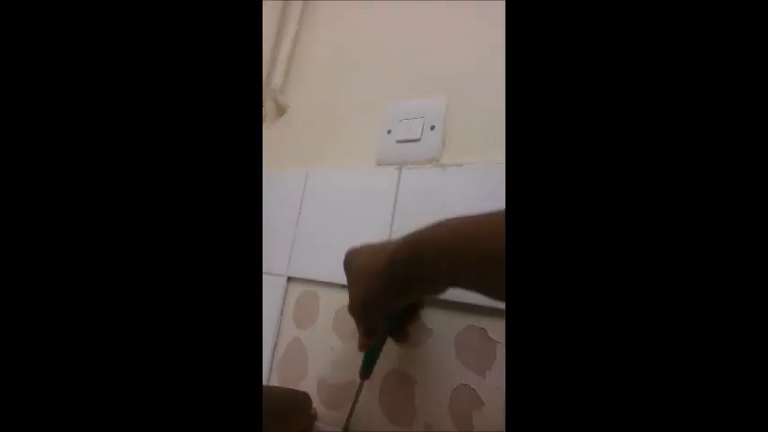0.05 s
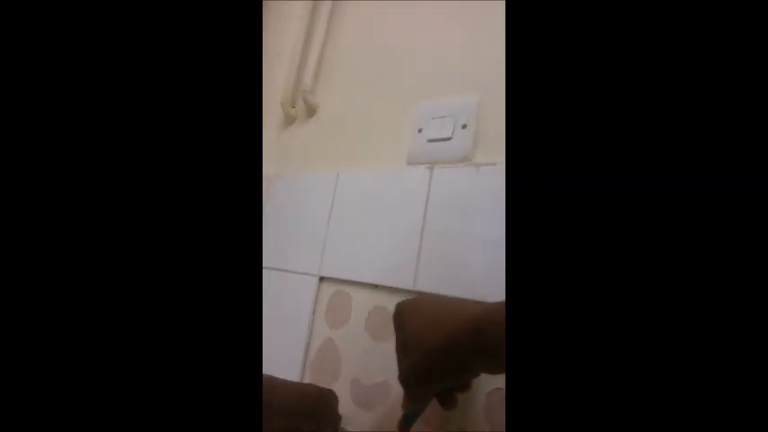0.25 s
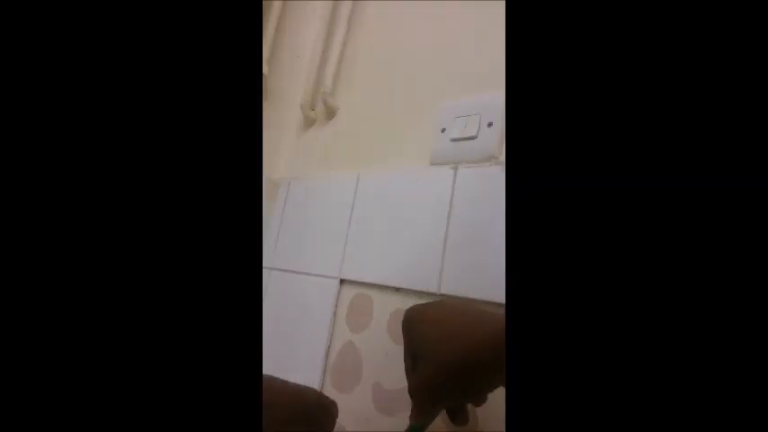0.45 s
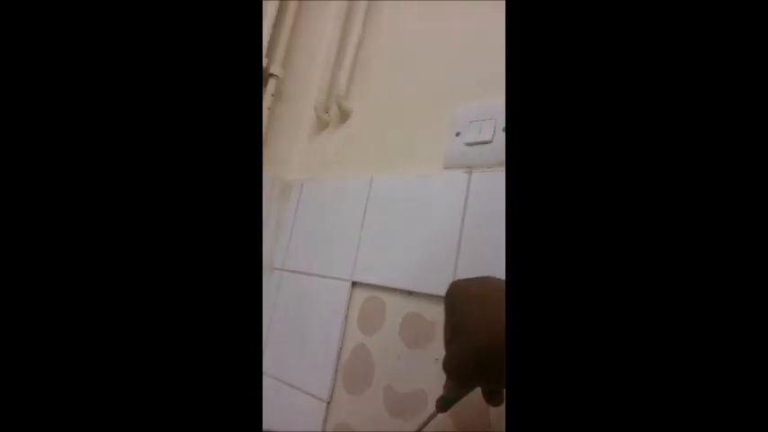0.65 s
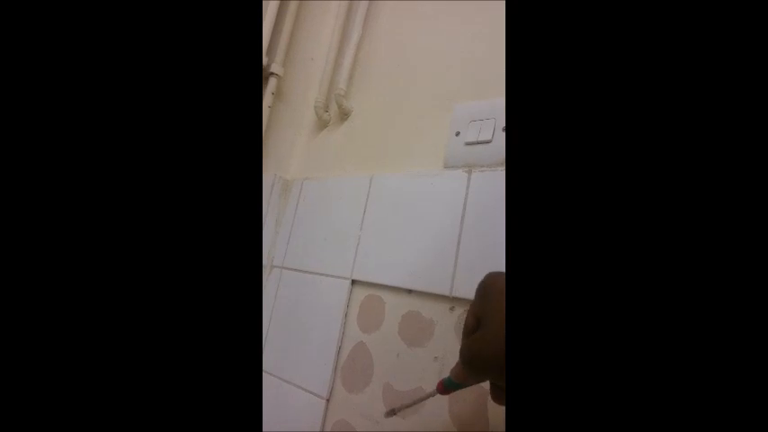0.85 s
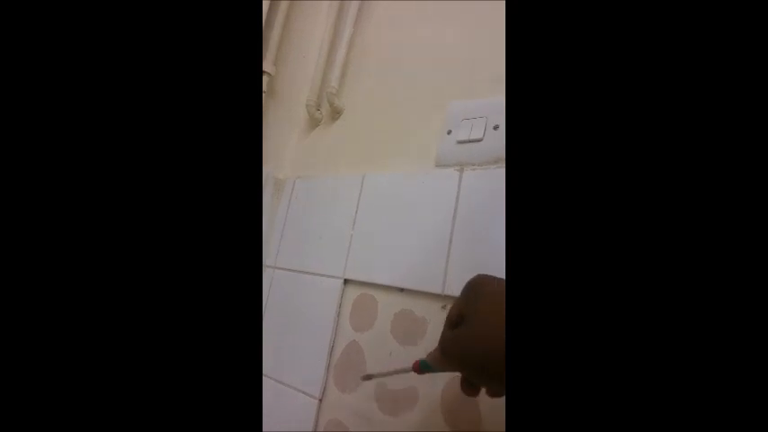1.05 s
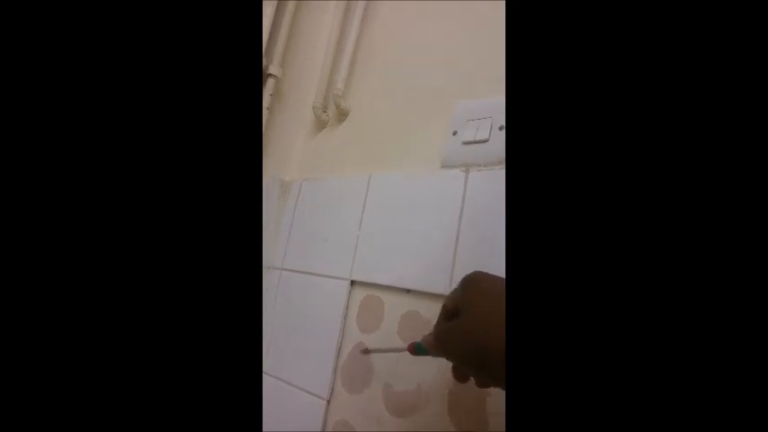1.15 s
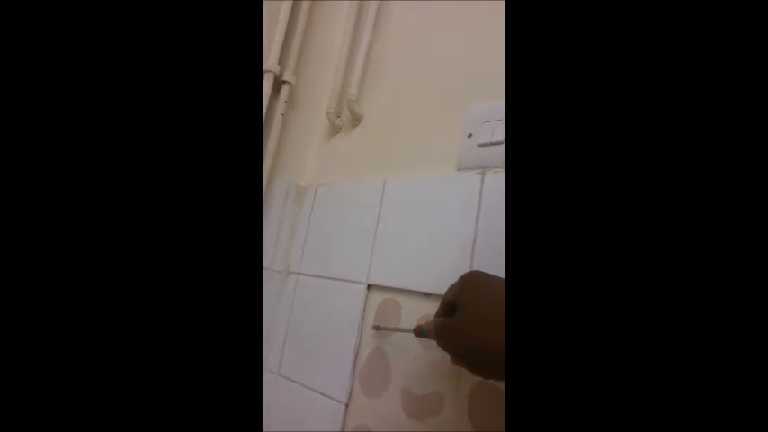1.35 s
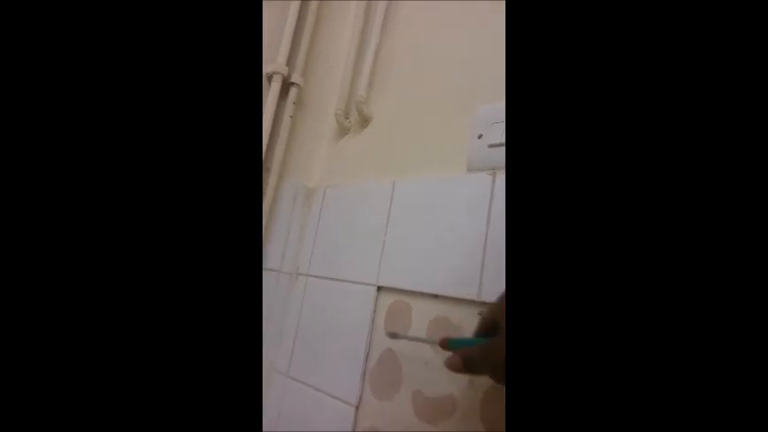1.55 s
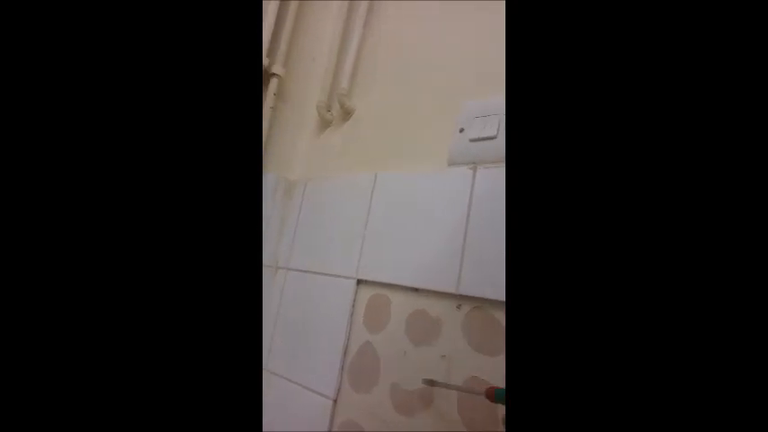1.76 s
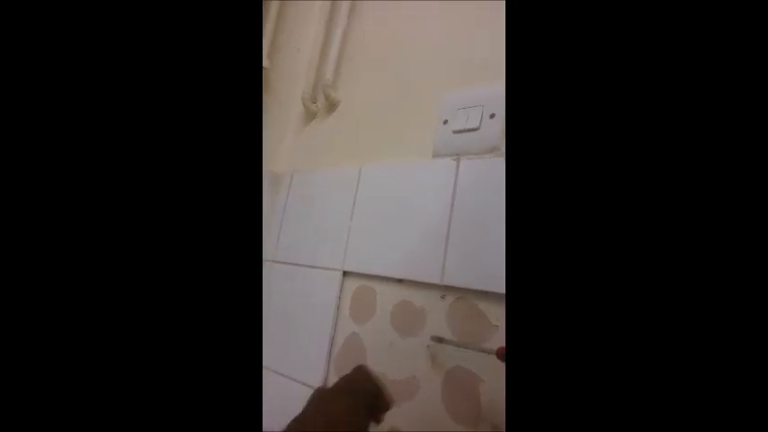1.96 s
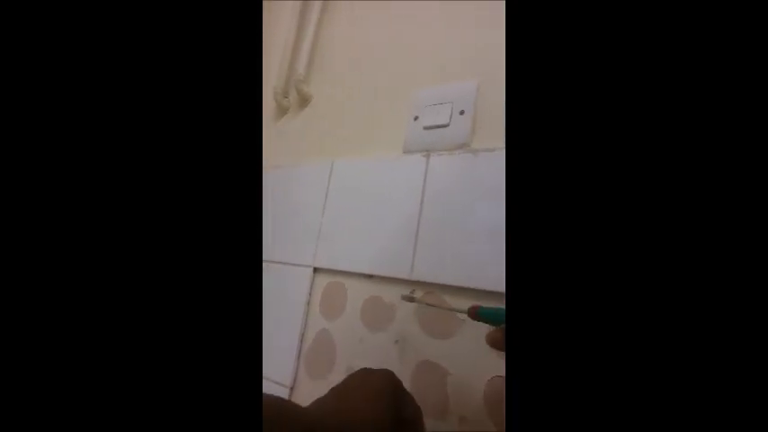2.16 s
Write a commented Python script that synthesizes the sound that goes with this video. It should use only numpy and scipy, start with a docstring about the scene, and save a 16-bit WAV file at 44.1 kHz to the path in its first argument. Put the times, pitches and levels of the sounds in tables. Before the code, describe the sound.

A screwdriver scrapes and knocks at tile grout in a small echoing room.

```python
"""A screwdriver scrapes and prises at the grout round a hollow wall tile in a small tiled room.
Its tip sticks and slips in short strokes and knocks against the edges; each contact rings the steel
blade, crunches grout, sprays fine grit and sounds the tile and the wall behind it. Brief notes sing out,
the hand bumps the wall, the tip glides once over the glaze and the shaft clinks twice near the end.
The room adds a short bright echo, and a phone close by picks it all up over a faint background noise."""
import sys
import numpy as np
from scipy import signal
from scipy.fft import rfft, irfft
from scipy.io import wavfile
from scipy.ndimage import uniform_filter1d

SR = 44100
rng = np.random.default_rng(int(sys.argv[2]) if len(sys.argv) > 2 else 0)


def digitize_waveform(pressure):
    """Quantize a signal to 16-bit integers and store it at the path in sys.argv[1].

    Rows of a 2-D input are taken as channels; values are limited to [-1, 1].
    """
    field = np.atleast_2d(pressure).T
    bounded = np.clip(field, -1, 1)
    quanta = np.round(bounded * 32767).astype(np.int16)
    wavfile.write(sys.argv[1], SR, quanta)


N = 97020


def undb(db):
    """Turn decibels into a number to multiply by."""
    return 10 ** (np.asarray(db) / 20)


def unit(response):
    """Scale a response (the sound that one tap gives) to an energy of one."""
    return response / np.sqrt(np.sum(response ** 2, axis=-1, keepdims=True))


def through(sound, response):
    """Pass a sound through a response."""
    return signal.fftconvolve(sound, response)[:N]


def steady(sound):
    """Even out the loudness over stretches of 25 ms."""
    return sound / np.sqrt(uniform_filter1d(sound ** 2, SR // 40))


def colour(points, size=2048):
    """A response that shapes the tone along (frequency [Hz], level [dB]) points."""
    hz, db = np.array(points).T
    f = np.maximum(np.arange(size // 2 + 1) * SR / size, 1)
    log_gain = np.log(undb(np.interp(np.log(f), np.log(hz), db)))
    cepstrum = irfft(log_gain)
    cepstrum[1:size // 2] *= 2  # folded so that nothing sounds before the tap
    cepstrum[size // 2 + 1:] = 0
    return irfft(np.exp(rfft(cepstrum)))


def fade(t, fade_s):
    """Die away by 60 dB in fade_s seconds; every fade time below means this."""
    return np.exp(-np.log(1000) * t / fade_s)


def ring(notes):
    """A tapped object rings with fading notes, each sounding only near its own pitch."""
    t, out = np.arange(SR // 2) / SR, 0
    for hz, db, fade_s in notes:
        note = np.sin(2 * np.pi * hz * t) * fade(t, fade_s)
        near_pitch = signal.iirpeak(hz, 2, fs=SR)
        out = out + undb(db) * unit(signal.lfilter(*near_pitch, note))
    return unit(out)


def surrounding_noise(size, bass_likeness=0.75, bass_hz=750):
    """Noise from all round at two microphones: alike in the bass, unrelated in the treble."""
    shared, own = rng.standard_normal(size), rng.standard_normal((2, size))
    f = np.arange(size // 2 + 1) * SR / size
    likeness = bass_likeness / (1 + (f / bass_hz) ** 2)
    return irfft(np.sqrt(likeness) * rfft(shared) + np.sqrt(1 - likeness) * rfft(own), size)


# Tone of the quiet room: (frequency [Hz], relative level [dB])
BACKGROUND_TONE = [(25, -23), (65, 9.5), (110, 7.5), (400, 1.5), (900, -9), (3000, -14), (5600, -7),
                   (8000, -18), (15000, -19.5)]
def background(level_db=-51):
    """A faint, steady rumble and hiss fills the room."""
    tone = unit(colour(BACKGROUND_TONE))
    return undb(level_db) * np.array([through(side, tone) for side in surrounding_noise(N)])


def stick_slip(slip_hz=300.2, slip_s=0.00079, rub_db=-10, judder_hz=124.3, judder_db=2, count=3000):
    """The tip catches and lets go in tiny uneven bursts over a steady rub, while the hand judders."""
    t = np.arange(N) / SR
    gaps, sizes, shakes = rng.standard_normal((count, 3)).T
    times = np.cumsum(np.exp(0.45 * gaps) / slip_hz)
    strengths = undb(4.5 * np.clip(sizes, -2, 2))
    slips = np.bincount((times * SR).astype(int), strengths, N)[:N]
    bursts = through(slips, np.exp(-t[:SR // 20] / slip_s))
    judder = undb(judder_db * np.interp(t * judder_hz, np.arange(count), shakes))
    grip = (bursts / bursts.std() + undb(rub_db)) * judder
    return steady(grip * rng.standard_normal(N))


# Strokes of the tip; the last three columns are added to the level:
# (start [s], length [s], level [dB], swell over the stroke [dB], crunch [dB], grit [dB], tile [dB])
STROKES = [(0.083, 0.037, -38.5, 0, -9.5, -10.5, -37), (0.122, 0.021, -34, 4, -7, -10.5, -30),
           (0.214, 0.12, -21.5, -0.5, -6.5, -13.5, -20.5), (0.317, 0.032, -18.5, 9, -12, -18.5, -17.5),
           (0.353, 0.017, -19, 10, -5, -6, -10.5), (0.368, 0.013, -6.5, -4, -13, -10, -29),
           (0.375, 0.046, -23.5, -7, -16, -31, -11), (0.408, 0.072, -29, 4, -7, -19, -18),
           (0.511, 0.049, -20.5, -3.5, -5, -4.5, -10.5), (0.561, 0.045, -20, 5.5, -9.5, -9.5, -10.5),
           (0.633, 0.038, -30, 9, -7.5, -12.5, -4), (0.719, 0.013, -20, -2.5, -0.5, -8.5, -13),
           (0.739, 0.014, -11, 2, -8.5, -12, -12.5), (0.779, 0.054, -27.5, 4, -11.5, -12.5, -26),
           (0.837, 0.035, -16.5, 7.5, -7, -12.5, -9.5), (0.88, 0.01, -24, 5, -3, -6, -24),
           (0.896, 0.0355, -14, 5, -7.5, -12.5, -15), (0.967, 0.087, -35, -5, -12, -13.5, -27),
           (1.066, 0.024, -16.5, -15.5, -9, -14.5, -24), (1.098, 0.11, -42.5, 14.5, -6, -7.5, -18),
           (1.205, 0.09, -33, 6.5, -8.5, -14, -14), (1.305, 0.071, -30, 6, -8.5, -8, -13.5),
           (1.394, 0.038, -36, 8, -14, -13, -18), (1.458, 0.112, -28.5, 6, -11, -11.5, -13),
           (1.58, 0.031, -30, 5, -0.5, -46, 4), (1.634, 0.051, -35.5, -13, -26, -11.5, 2.5),
           (1.704, 0.089, -38, -2.5, -3, -11, -2), (1.803, 0.044, -29.5, 8.5, -13, -17, -12)]
def scrapes(attack_s=0.005, release_s=0.0038, wall_db=-25.5):
    """Each stroke grows or eases, then stops; its rubbing sounds blade, grout, tile and wall."""
    t, pressure = np.arange(N) / SR, 0
    for start, length, db, swell, crunch_db, grit_db, tile_db in STROKES:
        age = t - start
        shape = np.clip(age / attack_s, 0, 1) * np.exp(-np.maximum(age - length, 0) / release_s)
        level = undb(db + swell * (np.clip(age / length, 0, 1) - .5))
        pressure = pressure + np.outer(undb([0, crunch_db, grit_db, tile_db, wall_db]), shape * level)
    friction = stick_slip()
    grains = steady(friction * np.abs(friction))  # grit breaks off only at the hardest slips
    forces = pressure * np.array([friction, friction, grains, friction, friction])
    return contact(*forces, knocked=False)


# Notes of the steel blade: (pitch [Hz], relative level [dB], fade time [s])
BLADE_NOTES = [(2880, 17.5, 0.017), (3346, 7, 0.0194), (4220, 5.5, 0.027), (5144, 1.5, 0.033),
               (5780, -1.5, 0.29), (9770, 4, 0.06)]
# Tone of the blade's hiss: (frequency [Hz], relative level [dB])
BLADE_TONE = [(1000, -40), (3600, -20.5), (4400, -2.5), (5300, 5.5), (6200, 1.5), (7100, -9), (9000, -18),
              (15000, -48)]
def blade(force, ring_db=-23.5):
    """The steel blade gives a bright hiss and a faint ring."""
    ringing, hiss = undb(ring_db) * ring(BLADE_NOTES), unit(colour(BLADE_TONE))
    hiss = np.pad(hiss, (0, len(ringing) - len(hiss)))
    return through(force, unit(ringing + hiss))


# Tones of crunching grout and of fine grit: (frequency [Hz], relative level [dB])
CRUNCH_TONE = [(100, -39), (300, -17.5), (520, -11.5), (800, -5.5), (1300, -2), (2100, -4.5), (3100, 5),
               (4200, 4), (7000, -24.5), (15000, -40)]
GRIT_TONE = [(2000, -17.5), (6000, 0), (8300, 14.5), (10500, 5.5), (15500, 2)]
def grout(crushing, spraying):
    """Grout crunches under the tip and sprays fine, hissing grit."""
    return through(crushing, unit(colour(CRUNCH_TONE))) + through(spraying, unit(colour(GRIT_TONE)))


# Notes of the tile: (pitch [Hz], share when knocked [dB], share when scraped [dB], fade time [s])
TILE_NOTES = [(956, -19, -12, 0.15), (981, 21, 0, 0.052), (1075.5, -24, -7, 0.17)]
def tile(force, knocked):
    """The hollow tile rings; a knock and a scrape bring out different notes."""
    notes = [(hz, knock_db if knocked else scrape_db, fade_s)
             for hz, knock_db, scrape_db, fade_s in TILE_NOTES]
    return through(force, ring(notes))


# Notes of the wall: (pitch [Hz], relative level [dB], fade time [s])
WALL_NOTES = [(237.3, -9, 0.056), (335.2, -8, 0.16), (433, -14, 0.41), (541, -8, 0.17), (621.6, -6, 0.043),
              (886, -6.5, 0.15), (1398, -6, 0.046)]
def wall(force):
    """The wall behind the tile rings with mostly lower notes."""
    return through(force, ring(WALL_NOTES))


def contact(on_blade, on_grout, on_grit, on_tile, on_wall, knocked):
    """One touch of the tip sounds all these parts together."""
    return blade(on_blade) + grout(on_grout, on_grit) + tile(on_tile, knocked) + wall(on_wall)


# Knocks of the tip; the last four columns are added to the level:
# (time [s], level [dB], crunch [dB], grit [dB], tile [dB], wall [dB])
KNOCKS = [(0.164, -27.5, -10, -11.5, -23, -14.5), (.195, -23.5, 2, -9.5, -13, -17),
          (0.206, -25, -10, -11, -28, -8), (0.375, -11, 3, -6, -4, -13), (.383, -15, 2, -9, -14, -14.5),
          (.466, -32.5, -6, -18, 4, -19), (0.495, -11.5, -5.5, -7, -37, -37),
          (.505, -19.5, 1.5, -0.5, -23, -13), (0.564, -14, -2.5, -12, -15, -20.5),
          (.613, -14, -4, -13, -36, -20), (0.7076, -16.5, -3.5, -8.5, -15, -39),
          (.744, -10.5, -7.5, -7.5, -10.5, -49), (0.9581, -13, -32, -40, -25, -35),
          (1.0605, -11, -11.5, -12, -36, -28), (1.229, -21, -4.5, -12.5, -15, -23.5),
          (1.3882, -23.5, -7.5, -20, 10.5, -9.5), (1.421, -35.5, -0.5, -22, 9.5, -11),
          (1.59, -20.5, -8.5, -13, 1, -6), (1.607, -16.5, -1, -31, -19, -6.5),
          (1.63, -26, -29, -45, 8, 4.5), (1.7276, -27, -3, -16, 4.5, 0.5), (1.768, -32, -4.5, -13, 3, 3.5),
          (1.849, -26, 9.5, -27, 9, 3.5), (1.872, -17, -1.5, -20, 3.5, -0.5),
          (1.9116, -22.5, -0.5, -37, -15, 1.5)]
def knocks(rattle_s=0.0011, size=2048):
    """Each knock is one push into tile and wall, and a brief rattle of the tip on the grout."""
    forces, t = np.zeros((5, N + size)), np.arange(size) / SR
    push = signal.unit_impulse(size)
    for at, db, *shares_db in KNOCKS:
        rattle = unit(rng.standard_normal(size) * np.exp(-t / rattle_s))
        strengths = np.sqrt(SR / 250) * undb(db) * undb([0, *shares_db])
        i = int(at * SR)
        forces[:, i:i + size] += strengths[:, None] * np.array([rattle, rattle, rattle, push, push])
    return contact(*forces[:, :N], knocked=True)


# Notes that the tip locks on to: those near 1.6 kHz from the screwdriver's shaft, the lower ones from tile or
# wall; the pitch depends on the spot: (peak time [s], pitch [Hz], level [dB], rise time [s], fade time [s])
SINGING_NOTES = [(.57, 1630, -22, 0.0057, 0.057), (0.61, 1650, -34.5, 0.0083, 0.15),
                 (0.71, 1571, -18.5, 0.0045, 0.051), (0.82, 1560, -26, 0.012, .11),
                 (0.93, 1560, -25.5, 0.015, 0.16), (.768, 910, -29.5, .014, .06),
                 (0.89, 985, -22.5, 0.015, 0.082), (0.94, 1006, -23, 0.019, 0.25),
                 (1.17, 985, -36, 0.013, 0.11), (.25, 530, -39.5, 0.033, 0.43)]
def singing(waver_hz=130.7, waver_rad=0.64, waver_db=3.5):
    """Notes build up under the rubbing tip, waver with its grip and ring out."""
    t, out = np.arange(N) / SR, 0
    for peak, hz, db, rise_s, fade_s in SINGING_NOTES:
        age = t - peak
        drift, flutter = (np.interp(t * waver_hz, np.arange(1024), steps)
                          for steps in rng.standard_normal((2, 1024)))
        shape = np.exp(np.minimum(age, 0) / rise_s) * fade(np.maximum(age, 0), fade_s)
        note = np.sqrt(2) * np.sin(2 * np.pi * hz * age + waver_rad * drift)
        out = out + undb(db + waver_db * flutter) * shape * note
    return out


# Bumps of the hand: (time [s], level [dB])
BUMPS = [(0.375, -38), (0.741, -46.5), (0.962, -29), (1.065, -31), (1.868, -34.5)]
# Low notes of a bump: (pitch [Hz], relative level [dB], fade time [s])
BUMP_NOTES = [(62, -10.5, 0.1), (139, -16.5, 0.069)]
def bumps():
    """The hand hits the wall with dull thuds."""
    force = np.zeros(N)
    for at, db in BUMPS:
        force[int(at * SR)] = np.sqrt(SR / 100) * undb(db)
    return through(force, ring(BUMP_NOTES))


# Tone of steel gliding on the glaze: (frequency [Hz], relative level [dB])
GLIDE_TONE = [(600, -30), (1250, 2), (2000, -2), (3000, -12.5), (8000, -14.5)]
def glide(start_s=1.1875, length_s=0.14, level_db=-33.5):
    """The flat of the tip glides over the glaze: a soft, hollow rub that swells and fades."""
    progress = np.clip((np.arange(N) / SR - start_s) / length_s, 0, 1)
    swell = np.sqrt(4 * progress * (1 - progress))
    return through(undb(level_db) * swell * stick_slip(), unit(colour(GLIDE_TONE)))


# Clinks of the shaft: (time [s], tile edge level [dB], steel level [dB])
CLINKS = [(1.8708, -15.5, -15), (1.911, -19, -17)]
# Notes of the tile's edge and of the shaft: (pitch [Hz], relative level [dB], fade time [s])
EDGE_NOTES = [(1142, -2.5, .04), (1204, -3, 0.1), (1236, -6, 0.18), (1276, 1.5, 0.2), (1410, -8.5, 0.13)]
SHAFT_NOTES = [(5300, 0, 0.053), (5800, 4, 0.027), (5870, -12, 0.077)]
def clinks():
    """The steel shaft strikes the edge of the tile, and both ring."""
    force = np.zeros((2, N))
    for at, edge_db, steel_db in CLINKS:
        force[:, int(at * SR)] = np.sqrt(SR / 250) * undb([edge_db, steel_db])
    return through(force[0], ring(EDGE_NOTES)) + through(force[1], ring(SHAFT_NOTES))


# The straight path to the phone, where the hand shades the treble: (frequency [Hz], relative level [dB])
DIRECT_TONE = [(1100, -0.5), (2500, -5.5), (5000, -5.5)]
def room(early_db, tail_db, early_s=0.0068, onset_s=0.0035, left_lag_s=0.00029, size=16384):
    """Each microphone hears the direct sound, quick echoes off nearby tiles and the room's tail."""
    t, f = np.arange(size) / SR, np.arange(size // 2 + 1) * SR / size
    spectrum = rfft(surrounding_noise(size))
    bass, treble = 1 / (1 + (f / 600) ** 2), f ** 2 / (f ** 2 + 7000 ** 2)
    bands = [(bass, 0.4), (1 - bass - treble, 0.29), (treble, 0.16)]
    tail = sum(irfft(spectrum * share) * fade(t, fade_s) for share, fade_s in bands)
    tail *= 1 - np.exp(-(t / onset_s) ** 2)
    early = surrounding_noise(size) * t * np.exp(-2 * t / early_s)
    response = undb(tail_db) * unit(tail) + undb(early_db) * unit(early)
    direct, lag = colour(DIRECT_TONE), int(left_lag_s * SR)
    response[0, lag:lag + len(direct)] += direct
    response[1, :len(direct)] += direct
    return unit(response)


def moving_echoes(sound, early_db, tail_db, new_spot_s=0.09):
    """The tip travels along the tile, so each stretch of the sound meets its own echoes."""
    hop, out = int(new_spot_s * SR), np.zeros((2, N))
    for i in range(0, N - hop, hop):
        piece = sound[i:i + 2 * hop]
        piece = piece * np.sin(np.pi * np.arange(len(piece)) / (2 * hop))  # blend with its neighbours
        heard = signal.fftconvolve(piece[None], room(early_db, tail_db), axes=1)[:, :N - i]
        out[:, i:i + heard.shape[1]] += heard
    return out


def scene():
    """Rubbing sounds and blows echo in the quiet room."""
    scraped, knocked, air = scrapes(), knocks(), background()
    rubbing = moving_echoes(scraped + glide() + singing(), early_db=0, tail_db=-4)
    # The hand is lifted for a knock, so more of the sound arrives directly.
    blows = moving_echoes(knocked + bumps() + clinks(), early_db=-3, tail_db=-6.5)
    return rubbing + blows + air


# Tones of the phone's two microphones: (frequency [Hz], gain [dB])
LEFT_MIC_TONE = [(100, -1), (330, 0), (560, -1), (950, -1.5), (1200, 0), (2000, 4), (3200, 1.5), (4800, 0),
                 (6000, -7), (7000, -7), (9000, -1.5), (14000, -1)]
RIGHT_MIC_TONE = [(100, 2), (1000, -1), (3000, 6), (4800, 2), (6000, 5.5), (14000, 4.5)]
def record(dry, ceiling=0.88, top_hz=15500):
    """Two unlike microphones, the left with its wave upside down; the highest treble is cut."""
    mics = np.array([-through(dry[0], colour(LEFT_MIC_TONE)), through(dry[1], colour(RIGHT_MIC_TONE))])
    rounded = mics / (1 + (mics / ceiling) ** 6) ** (1 / 6)  # soften the loudest peaks
    treble_cut = signal.ellip(12, .2, 80, top_hz, fs=SR, output="sos")
    return signal.sosfilt(treble_cut, rounded)


dry = scene()
out = record(dry)
digitize_waveform(out)
```